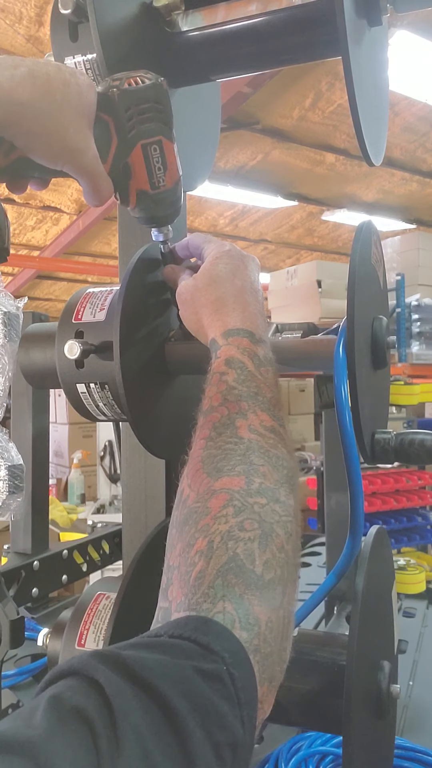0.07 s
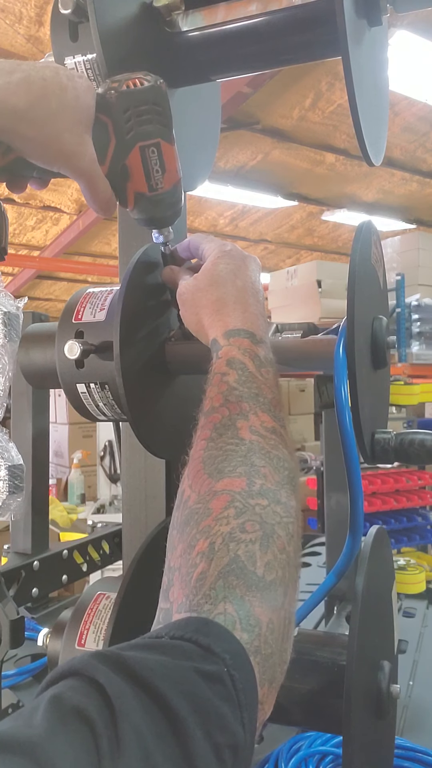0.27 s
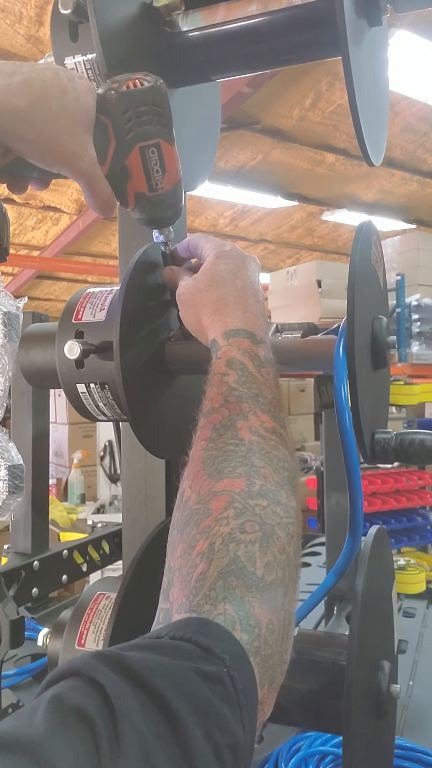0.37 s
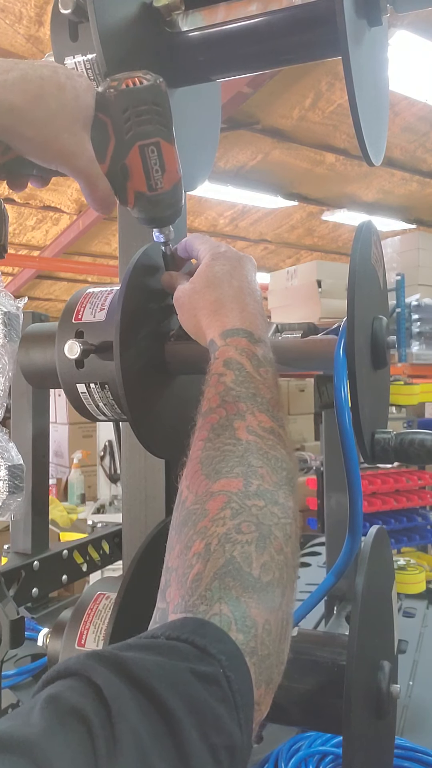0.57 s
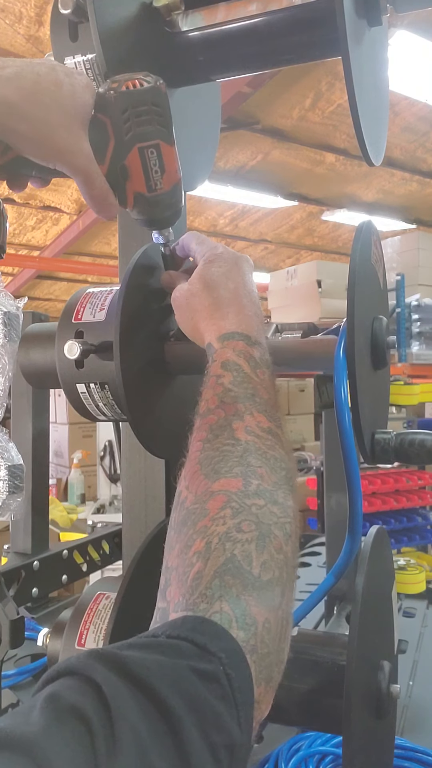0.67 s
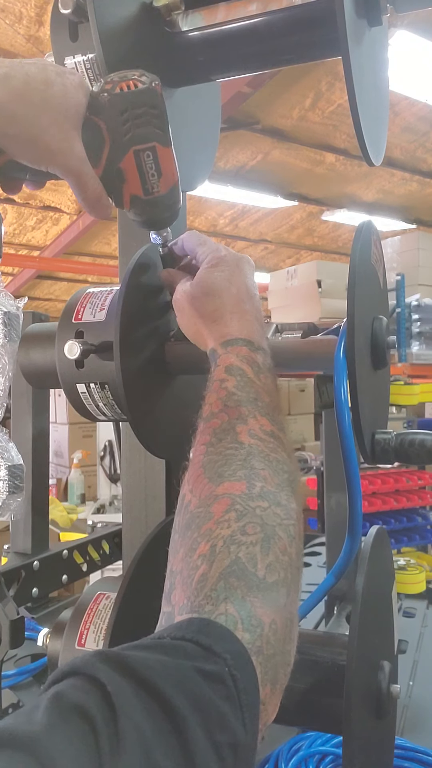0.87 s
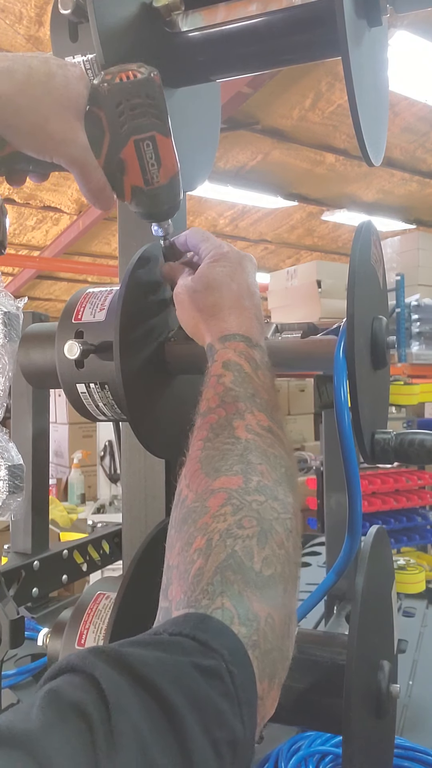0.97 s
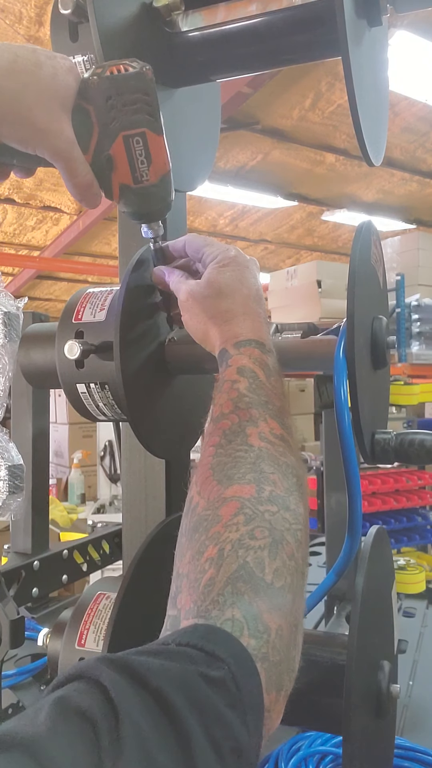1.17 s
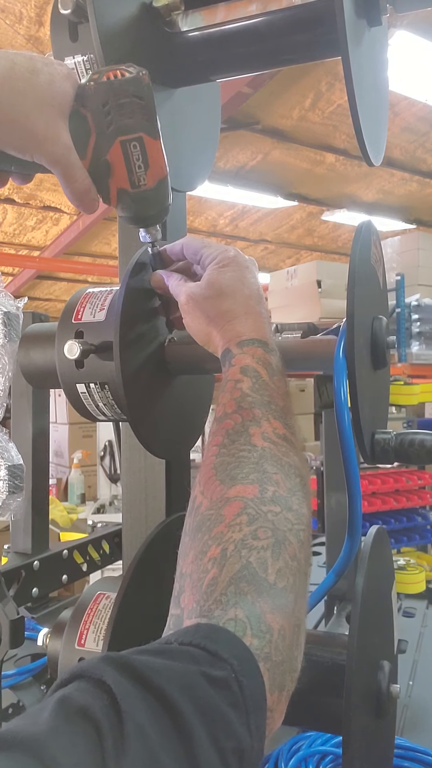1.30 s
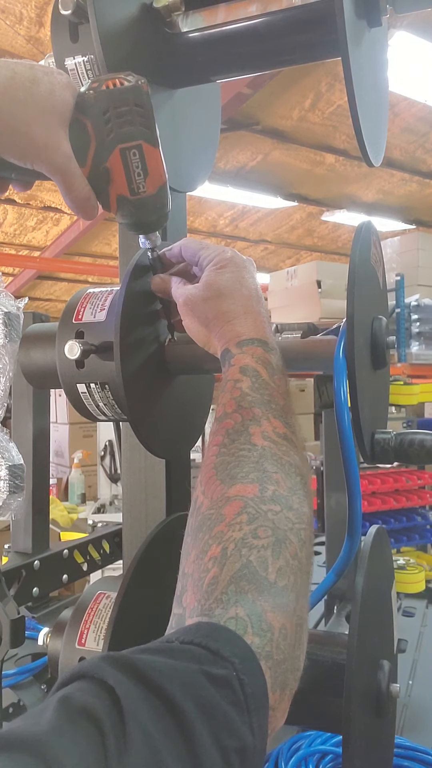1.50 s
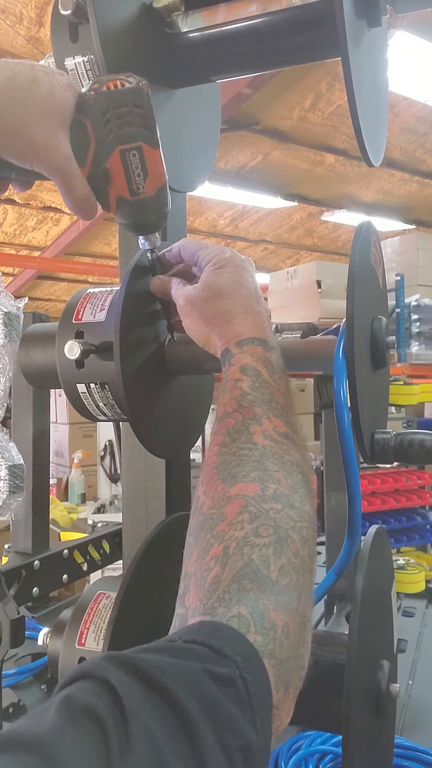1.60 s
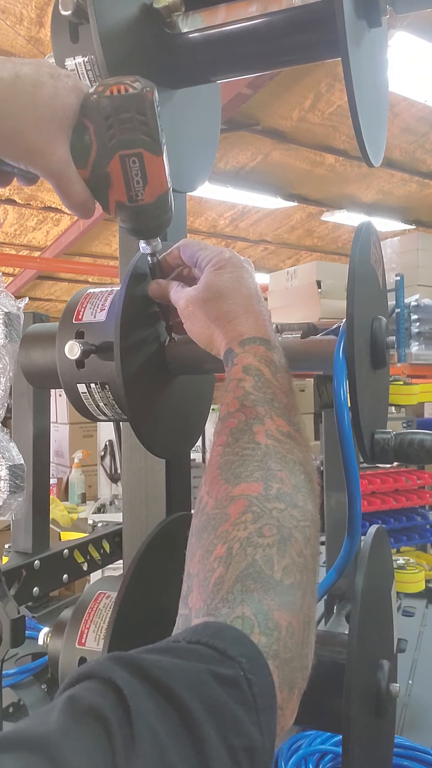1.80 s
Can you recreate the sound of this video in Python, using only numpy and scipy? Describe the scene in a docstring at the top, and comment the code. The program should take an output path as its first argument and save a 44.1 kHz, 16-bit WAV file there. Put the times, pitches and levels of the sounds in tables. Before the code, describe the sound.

Close up in a workshop, a cordless impact driver tightens a screw on a metal reel with two quick, rasping, rattling bursts. The metal rings and fades, leaving a faint hum, a few small clicks and a soft closing knock.

```python
"""A cordless impact driver tightens a screw on a metal hose reel, close by in a workshop.
Room air, a faint hum, a whirr and a low rumble open the scene, with light handling clicks.
Two short bursts follow: the motor spins up with a rasping gear whine, the hammer clacks and rings
the reel, the bit bites, and the gears tick as they coast. The hall rings on under a few more clicks
and two faint squeaks, and a dull knock in the frame ends it."""
import sys
import numpy as np
from scipy import signal
from scipy.fft import rfft, irfft
from scipy.io import wavfile
from scipy.ndimage import uniform_filter1d

SR = 44100
rng = np.random.default_rng(int(sys.argv[2]) if len(sys.argv) > 2 else 0)


def master(y):
    """Save y as 16-bit WAV."""
    cut = np.clip(np.atleast_2d(y).T, -1, 1)
    pcm = np.round(cut * 32767)  # scale
    wavfile.write(sys.argv[1], SR, pcm.astype(np.int16))


N = 81585

# room tone (frequency [Hz], relative level [dB])
AIR_EQ = [(15, -30.5), (28, -16.5), (48, -1.5), (75, -0.5), (100, -6.5), (135, -0.5), (190, -13.5),
          (300, -10), (480, -22.5), (1000, -26), (1400, -15.5), (1750, -29), (2100, -26.5), (2380, -19),
          (2800, -30.5), (3150, -16.5), (3500, -29), (3850, -12), (4500, -17), (5000, -39.5), (6000, -38.5),
          (7000, -46.5), (16000, -50)]
# hum and its thin whistles (frequency [Hz], level [dB])
HUM_TONES = [(70, -80.5), (1513, -90), (3171, -88), (3828, -88), (4430, -86)]
# whirr before the first pull (frequency [Hz], relative level [dB])
WHIRR_EQ = [(30, -13), (90, -9.5), (200, -11.5), (600, -13.5), (780, -9.5), (940, 1.5), (1100, -11),
            (1300, -4.5), (1900, -23), (4900, -21.5), (5800, -39), (16000, -52.5)]
# rumble of the frame (frequency [Hz], relative level [dB])
RUMBLE_EQ = [(25, -28.5), (60, -7), (95, -1.5), (140, -3.5), (220, -20.5), (500, -46), (16000, -92)]
# light handling (time [s], click level [dB], thud level [dB])
HANDLING_HITS = [(0.019, -55, -42), (0.0403, -50.5, -56.5), (1.0522, -65, -53), (1.0603, -66, -56),
                 (1.0928, -67, -50.5), (1.4542, -67, -85.5), (1.7495, -63, -54.5), (1.7563, -51, -44.5)]
# bright snap of ticks and clicks (frequency [Hz], relative level [dB])
TICK_EQ = [(60, -21.5), (400, -8), (1000, -4), (2400, 4), (4000, 3), (5000, -3.5), (7000, 3), (9500, -6.5),
           (12000, -17.5), (16000, -29)]
# body of a thud in the frame (frequency [Hz], relative level [dB])
THUD_EQ = [(30, -31.5), (110, -18.5), (300, -13.5), (430, -11.5), (560, -2), (1050, 6.5), (1400, -5),
           (2500, -8.5), (5000, -25.5), (16000, -62)]
# gear and trigger ticks (time [s], level [dB])
TICK_HITS = [(.1425, -45.5), (.1497, -34.5), (.378, -40.5), (.3865, -34), (.394, -33), (.402, -32),
             (.4092, -31), (.4168, -35), (.4368, -24.5), (.5212, -21), (.5287, -28.5), (.8112, -38.5)]
# motor curves, one per trigger pull (time [s], gear pulse rate [Hz], rasp gain [dB], whine gain [dB])
TRIGGER_PULLS = [
    [(.143, 129.9, -51, -50), (.16, 276.4, -37, -31.5), (.172, 415.4, -27.5, -30),
     (.19, 612.8, -24.5, -21.5), (.214, 756, -22.5, -24), (.238, 811.8, -21, -22.5),
     (.25, 809.3, -19.5, -15), (.262, 730.1, -19, -12), (.274, 613.6, -19, -14.5),
     (.297, 614.4, -21, -17.5), (.332, 558.2, -17.5, -18), (.348, 402, -40, -35), (.375, 201, -48.5, -48.5)],
    [(.521, 130.4, -37, -38), (.532, 280.8, -35.5, -26.5), (.547, 430, -24.5, -22.5),
     (.558, 605.8, -23, -18), (.59, 723.5, -18.5, -23.5), (.66, 593.5, -21.5, -22.5), (.7, 493, -30, -22.5),
     (.745, 345.1, -37, -32.5), (.765, 228.5, -62, -50), (.83, 128.2, -79, -41)],
]
# tone of the gear rasp (frequency [Hz], relative level [dB])
GEAR_EQ = [(60, -16.5), (300, -13.5), (900, 3.5), (2300, 0.5), (3300, -3), (4100, 3.5), (5200, -6.5),
           (7000, 5.5), (9500, 1.5), (12000, -8), (14000, -17.5), (16000, -32)]
# gear whine (harmonic [multiple of the pulse rate], relative level [dB])
WHINE_HARMONICS = [(1, -16.5), (2, -15.5), (3, -14.5), (4, -13), (5, -14.5), (6, -12.5), (7, -20),
                   (8, -20.5), (9, -19), (10, -22)]
# hammer blows (time [s], clack gain [dB], push on reel and frame [dB])
HAMMER_BLOWS = [(0.2599, -18, -6.5), (.2704, -6, -1), (0.2784, -5.5, -14.5), (0.2849, -10.5, -4.5),
                (.3097, -5.5, -5.5), (.3183, -8.5, 1), (0.3271, -12, -0.5), (.3345, -22.5, -4.5),
                (.5555, -20.5, -9.5), (.5742, -5.5, -5.5), (0.5782, -11, -7), (.6017, -4.5, 1),
                (.6072, -14.5, 1), (.63, -4, -1), (.6347, -13, 0.5), (0.6537, -5, -4.5), (.659, -5.5, -2),
                (.6793, -10, -3), (.688, -10, -1.5), (0.6897, -15, -18.5), (.6985, -12.5, -9),
                (.709, -15, -4.5), (0.7131, -8.5, -12.5), (.7172, -13, -5.5), (.728, -13, -11),
                (.7335, -19.5, -11.5), (0.7427, -16, -12), (.7525, -21, -28)]
# crack of the hammer (frequency [Hz], relative level [dB])
CLACK_EQ = [(60, -23), (300, -9), (900, 2), (2000, 0.5), (4000, -3), (5100, -6), (6500, 2.5), (8200, 2.5),
            (10000, -1), (11700, -7), (14000, -11), (16000, -28.5)]
# buzz of the gear case (frequency [Hz], relative level [dB])
CASE_EQ = [(60, -36), (1200, -15), (2400, -0.5), (4000, 1), (5200, -4), (6500, -2.5), (9000, -13.5),
           (16000, -34.5)]
# ring of the reel (frequency [Hz], relative level [dB], t60 [s])
REEL_MODES = [(253, -19.5, .45), (529.6, -2.5, .2), (564.5, -19.5, 0.63), (620.7, 0, .15), (661, -1, 0.016),
              (726, -15, .6), (757, -15.5, 0.69), (871, -8.5, 0.39), (922, -6, 0.11), (988, -6.5, .35),
              (1040, 2, 0.15), (1093, 3, 0.022), (1112, -4, .08), (1505, -19, 0.7), (1522, -32, 1.3),
              (1717, 0, 0.0059), (1835, -7, 0.068), (2025, -22.5, 0.66), (2300, -36, 1.3),
              (2554, -18, 0.46), (3229, -10.5, 0.25), (4030, -9, 0.051)]
# the bit jolts the frame (time [s], pitch [Hz], level [dB], t60 [s])
BIT_BITES = [(0.2634, 365, -22, 0.024), (0.2705, 1580, -10, 0.023), (0.272, 177, -30, 0.01),
             (.3185, 626, -19, 0.018), (.335, 140, -39.5, .15), (0.5564, 367, -21, 0.0075),
             (0.602, 1078, -7, 0.055), (0.628, 1080, -14.5, .02), (.635, 569, -14.5, 0.076),
             (0.6552, 1063, -12.5, 0.074), (0.6593, 893, -13, 0.086)]
# workshop reverb bands (frequency [Hz], relative level [dB], t60 [s])
HALL_BANDS = [(60.53, -7.5, 0.87), (149.6, -6, 0.2), (299.9, 2.5, 0.63), (600, -4, 0.42),
              (1100, -10.5, 0.45), (2198, -14, 0.37), (4330, -13.5, 0.24), (7856, -22.5, 0.23),
              (13990, -22, .19)]
# dark echo from the far end of the hall (frequency [Hz], relative level [dB])
FAR_ECHO_EQ = [(60, -8), (400, -8), (800, 2), (1200, -12), (2500, -23.5), (5000, -44.5), (16000, -78.5)]
# faint squeaks (time [s], length [s], level [dB])
SQUEAK_CUES = [(1.439, 0.11, -70), (1.65, .06, -72.5)]
# closing knock (time [s], level [dB])
KNOCK_HITS = [(1.7575, -47)]
# dull body of the knock (frequency [Hz], relative level [dB])
KNOCK_EQ = [(30, -25), (120, 2), (300, -15.5), (560, -3.5), (820, 3.5), (1150, -2.5), (1600, -13.5),
            (2300, -14), (2800, -30.5), (4300, -19), (5500, -37.5), (16000, -57)]

TIME = np.arange(N) / SR


def undb(db):
    """Decibels to gain."""
    return 10 ** (np.asarray(db) / 20)


def unit(x):
    """Scale to rms 1."""
    return x / np.sqrt(np.mean(x ** 2))


def colour(x, eq):
    """Causal filter through (Hz, dB) points that keeps the power of white noise."""
    hz, db = np.array(eq).T
    size = 4096
    freqs = np.maximum(np.fft.rfftfreq(size, 1 / SR), 1)
    cepstrum = irfft(np.log(undb(np.interp(np.log(freqs), np.log(hz), db))))
    cepstrum[1:size // 2] *= 2  # fold to minimum phase
    cepstrum[size // 2 + 1:] = 0
    response = irfft(np.exp(rfft(cepstrum)))
    return signal.fftconvolve(x, response / np.linalg.norm(response))[:N]


def noise(eq):
    """Steady noise shaped by an EQ curve."""
    return colour(rng.standard_normal(N), eq)


def release(hold_s, fall_s):
    """Full level until hold_s, then an exponential fade."""
    return np.exp(-np.maximum(TIME - hold_s, 0) / fall_s)


def bursts(hits, eq, rise_s, hold_s, fall_s):
    """A burst of shaped contact noise for each (s, dB): attack, hold, exponential release."""
    power = 0
    for start, db in hits:
        attack = np.clip((TIME - start) / rise_s, 0, 1)
        power += (undb(db) * attack * release(start + hold_s, fall_s)) ** 2
    grit = unit(np.tanh(rng.standard_normal(N)))
    return colour(np.sqrt(power) * grit, eq)


def walk(rate_hz):
    """Random levels held 1 / rate_hz seconds and slewed; rms 1."""
    step = int(SR / rate_hz)
    return unit(uniform_filter1d(rng.standard_normal(N)[np.arange(N) // step], step))


def wavering_tone(hz, waver_hz, rate_hz, start_cycles=0):
    """A sine whose pitch wanders around hz."""
    cycles = np.cumsum(hz + waver_hz * walk(rate_hz)) / SR + start_cycles
    return np.sin(2 * np.pi * cycles)


def room_tone():
    """A bed of room air and a faint hum with thin whistles, each drifting in pitch and level."""
    air = undb(-68.5) * noise(AIR_EQ)
    hum = sum(undb(db + 4.9 * walk(1.6)) * np.sqrt(2) * wavering_tone(hz, waver_hz=12, rate_hz=52)
              for hz, db in HUM_TONES)
    return air + hum


def whirr():
    """A faint whirr that fades as the first pull starts."""
    return undb(-52) * noise(WHIRR_EQ) * release(hold_s=.16, fall_s=.03)


def frame_rumble():
    """The frame rumbles low while the driver is pressed on."""
    return undb(-54) * noise(RUMBLE_EQ) * release(hold_s=.7, fall_s=.13)


def handling():
    """Bit and fingers touch: light clicks, each layered with a soft thud."""
    hits = np.array(HANDLING_HITS)
    clicks = bursts(hits[:, [0, 1]], TICK_EQ, rise_s=.00075, hold_s=.001, fall_s=.0026)
    thuds = bursts(hits[:, [0, 2]], THUD_EQ, rise_s=.0005, hold_s=.00099, fall_s=.0032)
    return clicks + thuds


def gear_ticks():
    """The gears take up their slack at the start and tick as they coast."""
    return bursts(TICK_HITS, TICK_EQ, rise_s=.00011, hold_s=.002, fall_s=.0012)


def motor(pull, jitter=.01, scatter_db=1.5, flutter_db=1.5, flutter_hz=68.7):
    """Gear teeth knock and whine at the motor's speed, each with a short rasp of noise."""
    times, pulse_hz, rasp_db, whine_db = np.array(pull).T
    started = TIME >= times[0]
    rate = np.interp(TIME, times, pulse_hz)
    cycles = np.cumsum(rate * (1 + jitter * walk(300)) * started) / SR
    tooth_gain = undb(scatter_db * rng.standard_normal(N))[cycles.astype(int)]
    gate = started * (TIME <= times[-1]) * tooth_gain
    teeth = np.diff(np.floor(cycles), prepend=0) * np.sqrt(SR / rate)
    rasp = unit(np.exp(-(cycles % 1)) * started) * rng.standard_normal(N)
    grind = undb(-17) * teeth + undb(-2.5) * rasp
    whine = 0
    for harmonic, db in WHINE_HARMONICS:
        tone = np.sin(2 * np.pi * (harmonic * cycles + rng.random()))
        whine += tone * undb(db + flutter_db * walk(flutter_hz))
    rasp_gain = gate * undb(np.interp(TIME, times, rasp_db))
    whine_gain = gate * undb(np.interp(TIME, times, whine_db))
    return colour(rasp_gain * grind, GEAR_EQ) + whine_gain * whine


def hammer(rise_s=.00028, hold_s=.0011):
    """Each blow clacks in the driver, buzzes its case and thuds into the frame."""
    blows = np.array(HAMMER_BLOWS)
    strikes, pushes = blows[:, [0, 1]], blows[:, [0, 2]]
    clack = bursts(strikes, CLACK_EQ, rise_s, hold_s, fall_s=.0013)
    case_buzz = bursts(strikes, CASE_EQ, rise_s, hold_s, fall_s=.005)
    thud = bursts(pushes, THUD_EQ, rise_s, hold_s, fall_s=.0069)
    return clack + undb(-13) * case_buzz + undb(-14.5) * thud


def reel_ring(rise_s=.001, beat_db=1.5, drift_hz=30):
    """Each blow adds energy to the reel's modes, which waver and beat a little as they die away."""
    pushes = np.zeros(N)
    for start, _, push_db in HAMMER_BLOWS:
        pushes[int(start * SR)] += undb(push_db) ** 2
    soften = np.exp(-1 / (rise_s * SR))
    ring = 0
    for hz, db, t60 in REEL_MODES:
        decay = np.exp(-2 * np.log(1000) / (t60 * SR))
        energy = signal.lfilter([1], [1, -decay], pushes + 1e-18)
        swing = signal.lfilter([1 - soften], [1, -soften], np.sqrt(energy))
        tone = wavering_tone(hz, waver_hz=3.98, rate_hz=drift_hz, start_cycles=rng.random())
        ring += swing * undb(db + beat_db * walk(drift_hz)) * tone
    return undb(-29.5) * ring


def bit_bites():
    """Short, damped clangs as the bit catches in the screw, each at its own pitch."""
    clangs = 0
    for start, hz, db, t60 in BIT_BITES:
        age = np.maximum(TIME - start, 0)
        clangs += undb(db) * np.sin(2 * np.pi * hz * age) * undb(-60 * age / t60)
    return clangs


def hall(send, predelay_s=.006, far_db=-32.5, far_t60_s=.91):
    """Diffuse workshop reverb with a short treble decay and a slow, dark echo from the far end."""
    band_hz = np.array(HALL_BANDS)[:, 0]
    freqs = np.maximum(np.fft.rfftfreq(N, 1 / SR), 1)
    band_position = np.interp(np.log(freqs), np.log(band_hz), np.arange(len(band_hz)))
    spectrum = rfft(rng.standard_normal(N))
    onset = np.clip(TIME / predelay_s - 1, 0, 1)
    tail = 0
    for index, (_, db, t60) in enumerate(HALL_BANDS):
        band = irfft(spectrum * np.maximum(1 - abs(band_position - index), 0), N)
        fade = onset * undb(-60 * TIME / t60)
        tail += undb(db) * fade / np.linalg.norm(fade) * band
    far = noise(FAR_ECHO_EQ) * undb(-60 * TIME / far_t60_s)
    return signal.fftconvolve(send, tail + undb(far_db) * far / np.linalg.norm(far))[:N]


def squeaks():
    """Two thin, wavering squeaks swell and fade."""
    swell = sum(undb(db) * np.sin(np.pi * np.clip((TIME - start) / length, 0, 1))
                for start, length, db in SQUEAK_CUES)
    return swell * wavering_tone(hz=1346, waver_hz=13.35, rate_hz=120)


def frame_knock():
    """A dull knock that rumbles on in the frame."""
    return bursts(KNOCK_HITS, KNOCK_EQ, rise_s=.00098, hold_s=.0039, fall_s=.055)


def scene():
    """Driver, reel and hands up front in the hall; a second, drier ring brings the reel close."""
    near = sum(motor(pull) for pull in TRIGGER_PULLS) + hammer() + reel_ring() + bit_bites()
    near += gear_ticks() + handling() + frame_knock()
    close_ring = reel_ring()
    reverb = hall(near + undb(-5) * close_ring)
    return (near + close_ring + reverb + squeaks() + room_tone() + whirr() + frame_rumble())[None]


def record(dry, drive=1.12, low_cut_hz=49, top_hz=15900):
    """The recorder rounds the loudest clacks, thins the lowest bass and cuts the top."""
    rounded = np.tanh(drive * dry) / drive
    thinned = signal.sosfilt(signal.butter(2, low_cut_hz, "high", fs=SR, output="sos"), rounded)
    return signal.sosfilt(signal.ellip(10, .2, 90, top_hz, fs=SR, output="sos"), thinned)


dry = scene()
out = record(dry)
master(out)
```